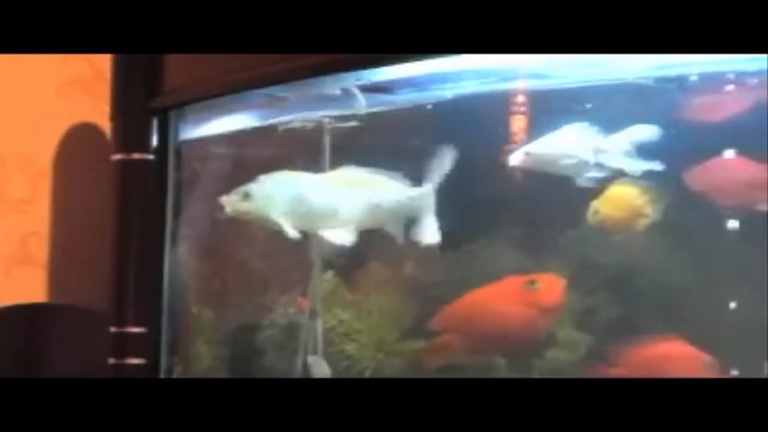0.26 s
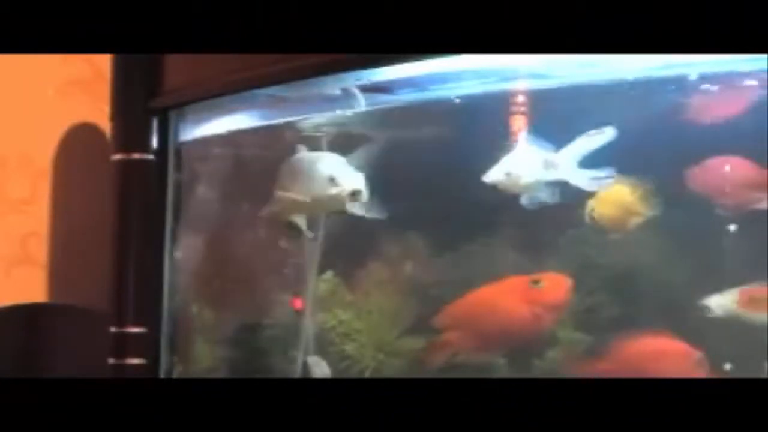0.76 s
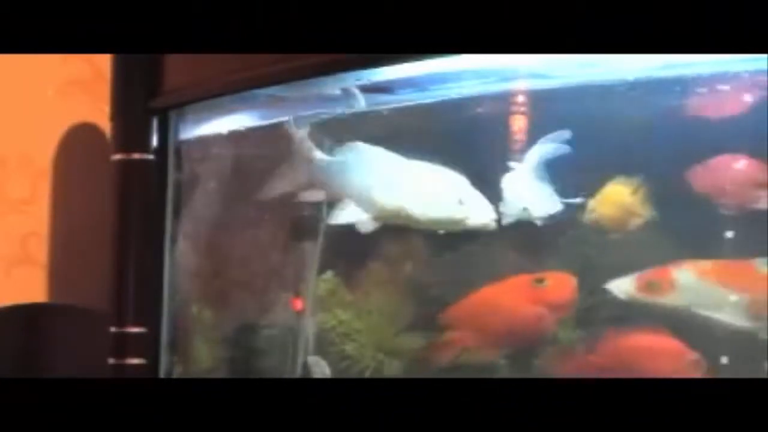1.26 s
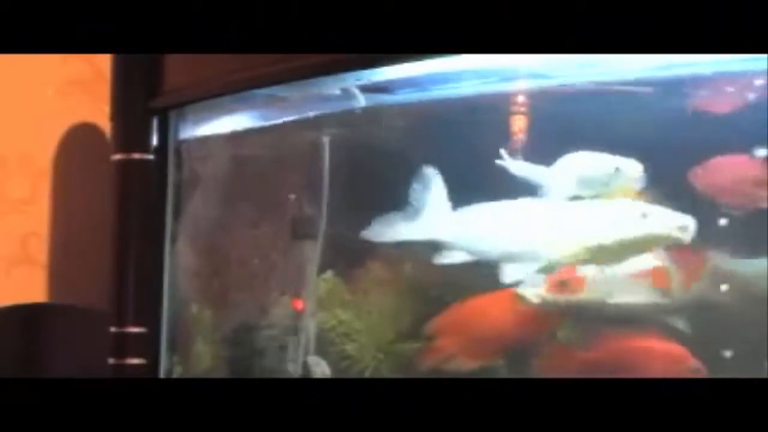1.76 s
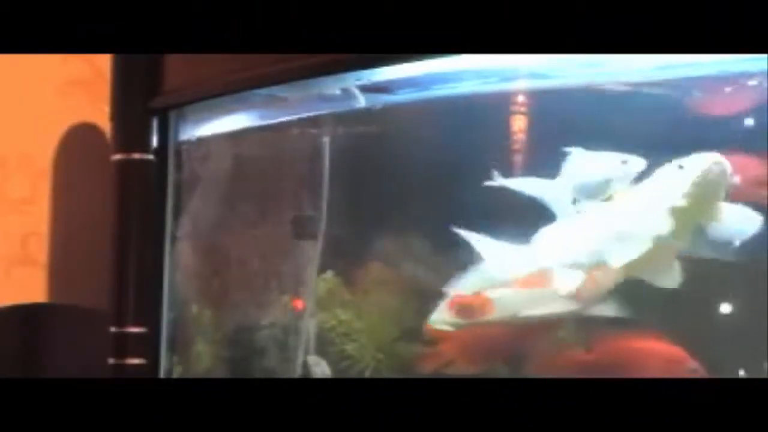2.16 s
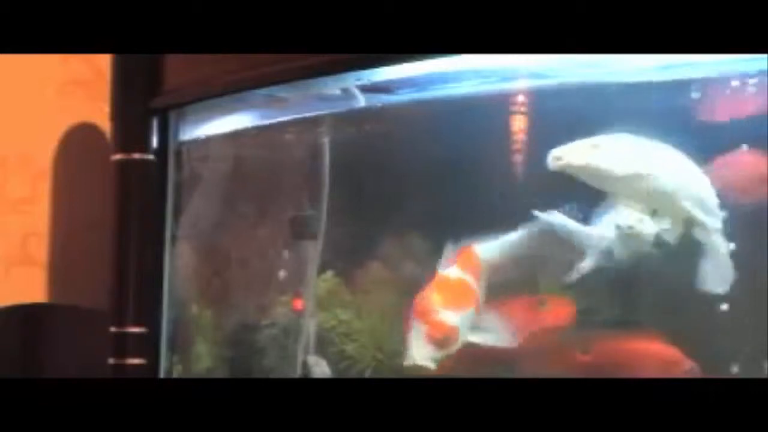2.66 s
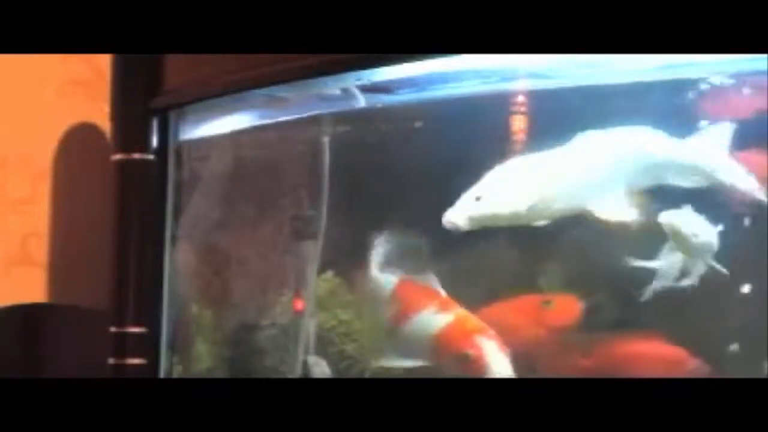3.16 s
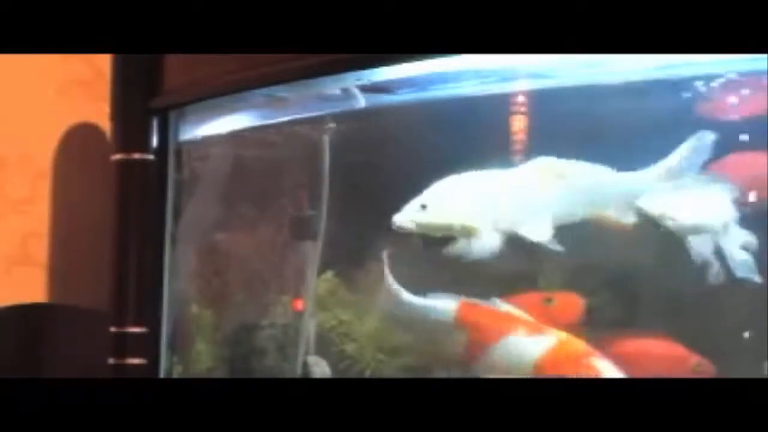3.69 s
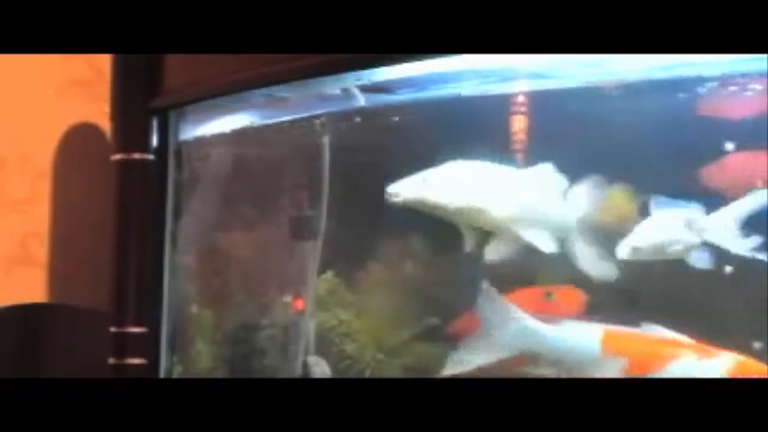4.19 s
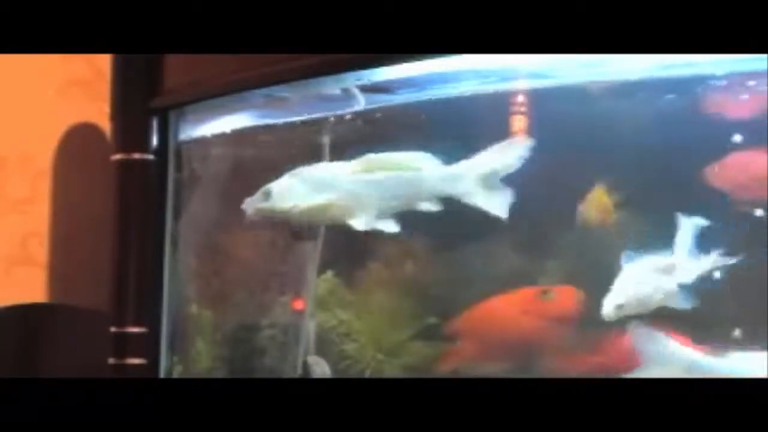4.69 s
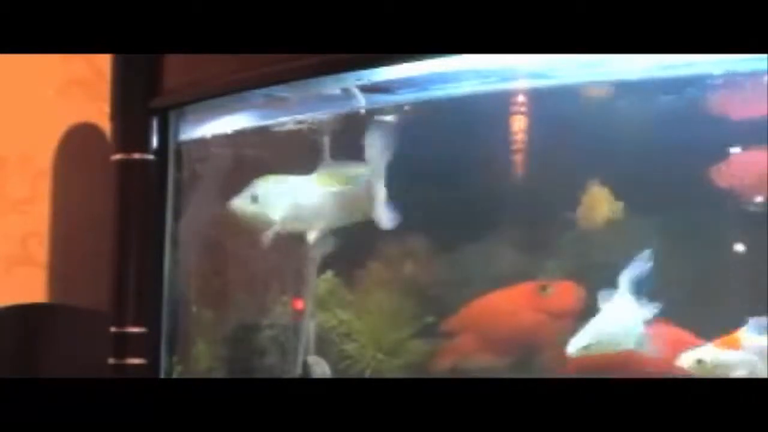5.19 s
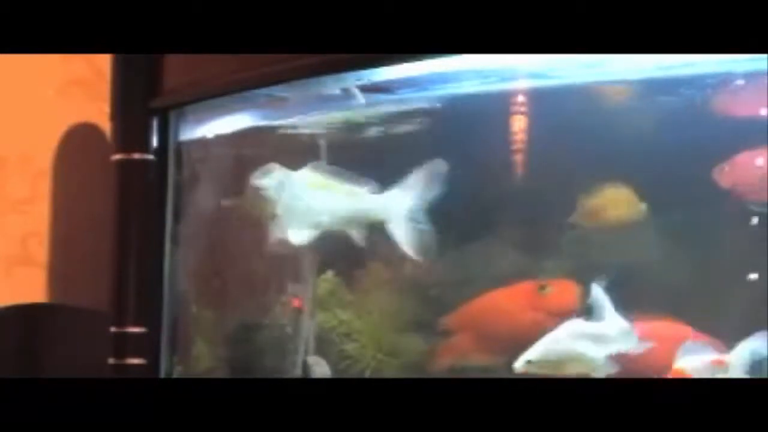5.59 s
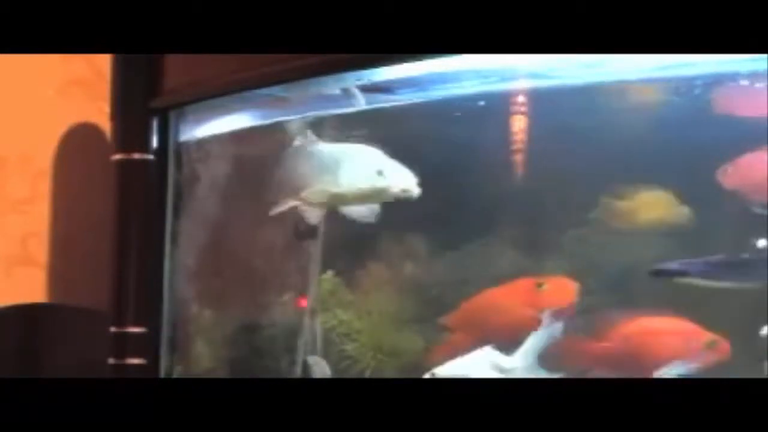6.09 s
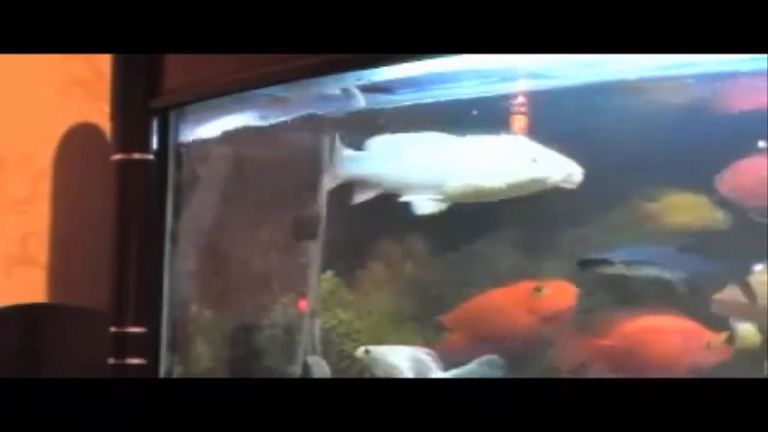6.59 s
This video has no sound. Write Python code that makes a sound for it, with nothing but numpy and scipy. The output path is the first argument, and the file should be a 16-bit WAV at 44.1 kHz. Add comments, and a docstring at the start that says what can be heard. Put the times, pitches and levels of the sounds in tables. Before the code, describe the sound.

Aquarium water hisses and trickles continuously in a small room, tiny bubbles pinging, while something hard snaps loudly nearby early and late, with softer knocks after.

```python
"""Aquarium filter in a small room

A home tank close to a stereo microphone. The pump buzzes on the mains harmonics, and the tones of its slower
rotor beat against them. The filter outflow is patchy noise that burbles and hisses, with swarms of damped sines
for its tiny bubbles; now and then a larger bubble gulps or pings. Twice something hard snaps nearby, each time
followed by a duller knock, with a faint thud just before the second snap: noise, ringing modes and room tail."""
import sys
import numpy as np
from scipy import signal
from scipy.fft import rfft, irfft, next_fast_len
from scipy.io import wavfile
from scipy.ndimage import uniform_filter1d, map_coordinates

SR = 44100
rng = np.random.default_rng(int(sys.argv[2]) if len(sys.argv) > 2 else 0)


def to_wav(sig):
    """Store sig (one row per channel, or 1-D mono) as 16-bit WAV at the path in sys.argv[1].

    Samples outside -1..1 are clipped; the rate is SR.
    """
    pcm = np.clip(np.atleast_2d(sig), -1, 1) * 32767
    pcm = np.round(pcm).astype(np.int16)
    wavfile.write(sys.argv[1], SR, pcm.T)  # frames by channels


N = 302085

# pitches that the air space under the lid favours: f/Hz, width/Hz, lift/dB
LID = [(970, 60, 7), (2580, 50, 5), (2750, 45, 3.5), (3214, 250, 3), (3560, 47, 5.5), (6580, 160, 1.5),
       (7070, 140, -0.5)]
# left-right likeness of tank and room sound: f/Hz, likeness (1 is identical; more counts as 1)
TANK_LIKENESS = [(35, 0.3), (100, 0.75), (300, .8), (700, 0.73), (1800, 1.08), (3100, 1.1), (5500, 0.8),
                 (8500, 1), (11000, 1)]


def amp(db):
    """Gain of a level in dB."""
    return 10 ** (np.asarray(db) / 20)


def unit(x):
    """Scaled to rms 1."""
    return x / np.sqrt(np.mean(x ** 2) + 1e-20)


def along(points, hz):
    """Read (frequency, value) points at hz on a log frequency axis."""
    f, v = np.transpose(points)
    return np.interp(np.log(hz + 1), np.log(f + 1), v)


def wobble(rate):
    """A smooth random curve, rate knots a second."""
    knots = rng.standard_normal(int(N * rate / SR) + 4)
    return map_coordinates(knots, [np.arange(N) * rate / SR])


def filtered(x, response):
    """x times a response of frequency."""
    m = next_fast_len(x.shape[-1] + 8192)
    gain = response(np.fft.rfftfreq(m, 1 / SR))
    return irfft(rfft(x, m) * gain, m)[..., :x.shape[-1]]


def spread(shared, opposed, likeness):
    """Left and right from a shared and an opposed signal, mixed so that their likeness follows the table."""
    def shares(hz):
        turn = np.arccos(np.clip(along(likeness, hz), -1, 1)) / 2
        return np.array([np.cos(turn), np.sin(turn)])

    mid, side = filtered(np.array([shared, opposed]), shares)
    return np.array([mid + side, mid - side])


def patchy(depth_db, size):
    """Two white noises with the same patches of random gain, size cells wide in time and pitch."""
    z = signal.stft(rng.standard_normal((2, N)), nperseg=256)[2]
    field = rng.standard_normal(z.shape[1:])
    field = uniform_filter1d(uniform_filter1d(field, size, 0), size, 1)
    return unit(signal.istft(z * amp(depth_db * unit(field)), nperseg=256)[1][:, :N])


def bubbles(s, db, hz, cycles, rise, size):
    """Damped sines, size samples at most, that start softly and climb in pitch as the bubble nears the surface."""
    k = np.arange(size)
    u = k * hz[:, None] / SR / cycles  # the envelope peaks at u = 1
    envelope = amp(db)[:, None] * np.e * u * np.exp(-u)
    tone = envelope * np.sin(2 * np.pi * cycles * u * (1 + rise * u))
    places = np.round(s * SR).astype(int)[:, None] + k
    return np.bincount(places.ravel(), tone.ravel(), N + size)[:N]


def dying(count):
    """Two noises, count samples long, in which each frequency dies at the room's own speed."""
    # reverberation of the room: f/Hz, t60/s
    reverb_time = [(250, 0.31), (1000, .3), (3000, .27), (8000, .2)]
    hz, t, z = signal.stft(rng.standard_normal((2, count)), SR, nperseg=256)
    decay = amp(-60 * t / along(reverb_time, hz)[:, None])
    return signal.istft(z * decay, SR, nperseg=256)[1][:, :count]


def room(x):
    """The room's answer to a sound from the tank: convolution with a dying noise."""
    tail = dying(count=SR // 2)
    tail = tail / np.linalg.norm(tail[0])
    answer = signal.fftconvolve(x[None], tail, axes=1)[:, :len(x)]
    return spread(*answer, TANK_LIKENESS)


def pump():
    """Steady mains harmonics, and three slightly unsteady rotor tones just below multiples of twice the mains."""
    # strongest tones of the buzz: mains multiple, level/dB rms
    strong_tones = [(1, -98), (2, -84), (4, -77), (5, -78), (10, -83), (13, -83), (16, -78), (20, -77),
                    (25, -81), (26, -78), (27, -75), (28, -81), (30, -75), (43, -81), (48, -82)]
    # mean level of the first to third rotor tone: level/dB rms
    rotor_levels = [-83, -82, -84]
    mains_hz, last_multiple = 50.042, 50
    faint_db, faint_scatter_db = -88.5, 4.5  # all the other multiples
    slip_hz = 3.08  # turns that the rotor loses a second on the field at twice the mains
    quiet_s = .075  # a quiet moment of the beat
    t = np.arange(N) / SR
    mains = 2 * np.pi * mains_hz * t
    start = 2 * np.pi * rng.random(100)
    faint = faint_db + faint_scatter_db * rng.standard_normal(last_multiple)
    levels = dict(enumerate(faint, 1)) | dict(strong_tones)
    hum = sum(amp(db) * np.sin(k * mains + start[int(k)]) for k, db in levels.items())
    rotor = 2 * mains - 2 * np.pi * slip_hz * (t - quiet_s)
    for k, db in enumerate(rotor_levels, 1):
        # half a turn apart, so whole lost turns are the quiet points of the beat
        hum -= amp(db + .6 * wobble(2.53)) * np.sin(k * rotor + start[2 * k])
    return np.sqrt(2) * hum  # sine peak from rms


def water():
    """Burble and hiss of the outflow, both patchy, with swarms of tiny bubbles in the hiss."""
    # spectral shape of the burble: f/Hz, relative level/dB per Hz
    burble_colour = [(20, -26), (64, -19), (130, -14.5), (190, -9.5), (250, -0.5), (320, -4), (400, -5.5),
                     (900, -1), (1500, -10), (2500, -28.5)]
    # spectral shape of the hiss before the lid: f/Hz, relative level/dB per Hz
    hiss_colour = [(600, -30), (1200, -13), (1800, -7.5), (2600, -5), (3300, -3.5), (4500, -4.5),
                   (6000, -5.5), (7400, -2.5), (9000, -13.5), (11500, -26), (15000, -52)]
    # slow course of the burble: t/s, mean level/dB
    burble_course = [(0, -60), (2.3, -60.4), (3.3, -60.5), (4.4, -58.5), (5.2, -60.5), (6.85, -60)]
    hiss_db = -52.5  # mean level
    burble_db = np.interp(np.arange(N) / SR, *np.transpose(burble_course))
    burble = unit(filtered(patchy(2.0, size=7), lambda hz: amp(along(burble_colour, hz))))

    # short bursts at the surface crackle
    when, pitch, strength = rng.random((2500, 3)).T
    crackle = bubbles(when * N / SR, -1.8 * np.log(strength), 4500 * 2.4 ** pitch,
                      cycles=1.26, rise=0.038, size=128)
    # longer-lived bubbles sing for a moment
    when, pitch, strength = rng.random((1200, 3)).T
    singing = bubbles(when * N / SR, -1.6 * np.log(strength), 2400 * 3.8 ** pitch,
                      cycles=10, rise=0.0023, size=1024)
    swarms = amp(-13.5) * unit(crackle) + amp(-16) * unit(singing)
    fizz = patchy(1.52, size=9) + [[1], [0]] * swarms  # swarms in the shared signal only

    def under_lid(hz):
        lift = sum(db / (1 + (2 * (hz - centre) / width) ** 2) for centre, width, db in LID)
        return amp(along(hiss_colour, hz) + lift)

    hiss = unit(filtered(fizz, under_lid))
    flow = amp(burble_db + 0.76 * wobble(6)) * burble
    flow = flow + amp(hiss_db + 0.5 * wobble(12)) * hiss
    # the room adds a fixed fine ripple to the spectrum and blurs the grain
    return spread(*flow, TANK_LIKENESS) + amp(-13) * room(flow[0])


def big_bubbles():
    """Bubbles that stand out over the hiss, each a damped sine, heard near and in the room."""
    # single bubbles: t/s, peak level/dB near the tank, starting f/Hz, cycles until the peak
    single = [(.323, -45, 6520, 5), (1.95, -59, 390, 3), (2.333, -58, 727, 4), (2.616, -54, 518, 3),
              (2.624, -52.5, 407, 5.9), (2.69, -51, 1840, 4), (2.782, -54, 977, 5), (3.368, -38.5, 7100, 4),
              (3.435, -51, 2600, 6.3), (3.755, -58, 680, 3), (3.849, -53, 560, 4.3), (3.865, -57, 680, 4),
              (3.87, -58, 275, 2.1), (3.94, -56.5, 388, 2.6), (3.98, -55, 1420, 4), (4.152, -49, 3200, 7),
              (4.469, -57, 398, 3)]
    # random pings on the lid pitches above the lowest: mean level at 3 kHz, and its slope
    pings, ping_db, ping_db_per_octave = 16, -50, 5.5
    s, db, hz, cycles = np.transpose(single)
    when, which, strength = rng.random((pings, 3)).T
    upper = np.transpose(LID)[0, 1:]
    ping_hz = upper[(which * len(upper)).astype(int)]
    level = ping_db + ping_db_per_octave * np.log2(ping_hz / 3000) + 2.5 * (strength - .5)
    near = bubbles(s, db, hz, cycles[:, None], rise=.008, size=4096)
    near = near + bubbles(when * N / SR, level, ping_hz, cycles=6, rise=0.0075, size=1024)
    return near + amp(-3.0) * room(near)


def blows():
    """A short crack repeated by the first walls, ringing modes, a hollow body and the room's tail."""
    # blows: t/s, level/dB of the early noise, softness (0 snap, 1 thud), hollow body/dB re that noise
    strokes = [(.798, -21.5, 0.13, -13), (1.3614, -36, .4, -11), (5.737, -48, 1, 5),
               (5.92, -18.5, 0, -14.5), (6.514, -37.5, 0.31, -13)]
    # spectral shapes of a snap and of a knock before the low-pass: f/Hz, relative level/dB per Hz
    snap_colour = [(90, -55), (150, -32.5), (440, -22.5), (615, -7.5), (700, -14.5), (840, -8.5),
                   (1080, -11), (1320, -4.5), (1520, -10), (1950, -3.5), (2330, -7.5), (2900, 0.5),
                   (4070, -7), (4600, -13), (5800, -12.5), (7600, -11), (12000, -47.5), (15600, -92)]
    knock_colour = [(120, -46), (200, -16), (330, -17), (410, -7.5), (525, -8), (650, 2.5), (1100, -5),
                    (1340, 1.5), (1650, -3), (2000, -12.5), (3200, -20), (4500, -30), (8800, -120)]
    # ringing modes after a blow: f/Hz, mean relative level/dB, t60/s
    modes = [(1335, -6, 0.23), (1643, -3.5, 0.25), (1754, -5, 0.23), (2240, -22, .2), (2760, 4, 0.13),
             (3130, -9, 0.37), (3250, -5, 0.23), (3365, -14, 0.29), (3800, -7, .15), (4280, -13, .15),
             (6350, -22, 0.091), (7400, -15, .2)]
    # direct sound and first walls: delay/s, relative level/dB
    walls = [(0, -5), (.004, -3.5), (.008, 1), (.012, -4.5), (.016, -4.5), (.023, -9.5), (0.038, -12)]
    # left-right likeness of the blows: f/Hz, likeness
    blow_likeness = [(300, 1), (3000, 0.95), (5500, .85), (7000, 0.76), (9000, 1)]
    hard_hz, soft_hz = 15000, 1500  # low-pass of the hardest and the softest blow
    body_hz = 576.4  # the hollow body that is struck
    out, t = np.zeros((2, N + SR)), np.arange(SR // 2) / SR
    cracks = sum(amp(db - 60 * np.abs(t - lag) / .022) * np.clip((t - lag) / 0.00068, 0, 1)
                 for lag, db in walls)
    filling = 1 - np.exp(-t / 0.0053)  # tail, ringing and body build up softly
    for s, db, soft, body_db in strokes:
        cut_hz = hard_hz * (soft_hz / hard_hz) ** soft
        knock = soft > .2
        table = knock_colour if knock else snap_colour
        noise = rng.standard_normal((2, len(t))) * cracks
        noise = noise + amp(-3.0) * filling * dying(count=len(t))
        noise = filtered(noise, lambda hz: amp(along(table, hz)) / (1 + (hz / cut_hz) ** 4))
        noise = spread(*noise, blow_likeness)
        ring = 0
        for hz, level, t60 in modes:
            decay = amp(level + rng.normal(0, 2.7) - 60 * t / t60)
            # a soft blow wakes only the low modes
            damping = 1 + knock * (hz / 2000) ** 6 + (hz / cut_hz) ** 8
            ring = ring + decay / damping * np.sin(2 * np.pi * (hz * t + rng.random()))
        body = amp(body_db - 60 * t / 0.22) * np.sin(2 * np.pi * body_hz * t)
        early_rms = np.sqrt(np.mean(noise[:, :1024] ** 2))
        blow = noise / early_rms + filling * (amp(-8 + 3.6 * knock) * ring + body)
        out[:, round(s * SR):][:, :len(t)] += amp(db) * blow
    return out[:, :N] * amp([[-.4], [.4]])  # a little to the right


def scene():
    """Pump, outflow, larger bubbles and blows together."""
    return pump() + water() + big_bubbles() + blows()


def record(dry):
    """The microphone's right port is a little more sensitive; nothing is kept above the band limit."""
    # balance of the two ports: f/Hz, left minus right/dB
    port_balance = [(100, -1.8), (1000, -1.5), (2000, -.6), (4100, -2.2), (6500, -.7), (8300, -1.6),
                    (11000, -.1)]
    top_hz = 15000
    halves = np.array([[.5], [-.5]])
    return filtered(dry, lambda hz: amp(along(port_balance, hz) * halves) * (hz < top_hz))


dry = scene()
out = record(dry)
to_wav(out)
```